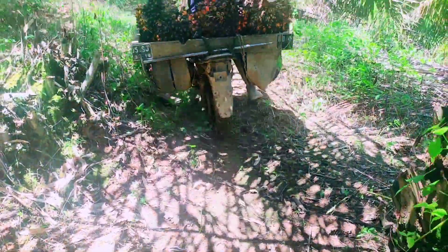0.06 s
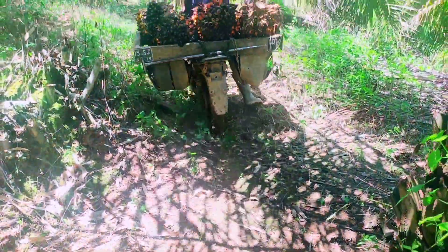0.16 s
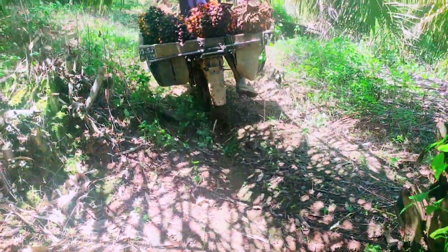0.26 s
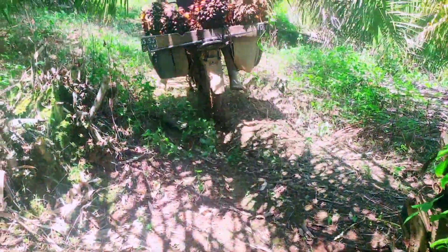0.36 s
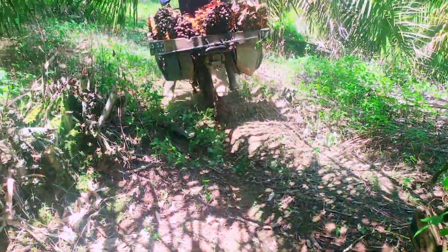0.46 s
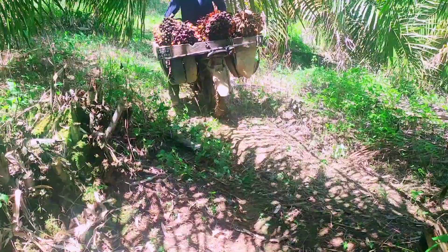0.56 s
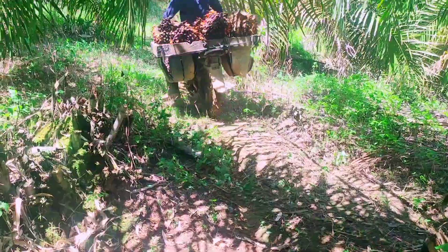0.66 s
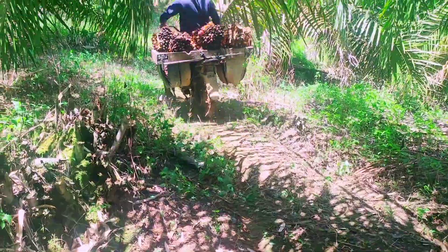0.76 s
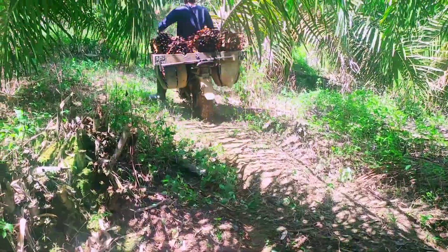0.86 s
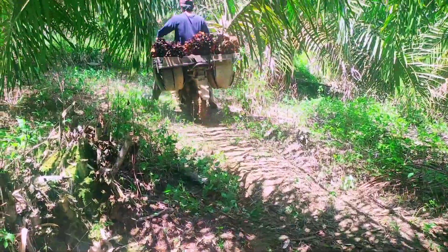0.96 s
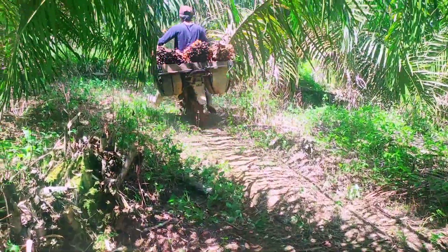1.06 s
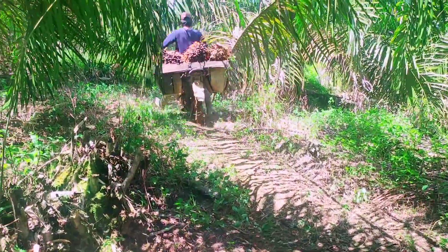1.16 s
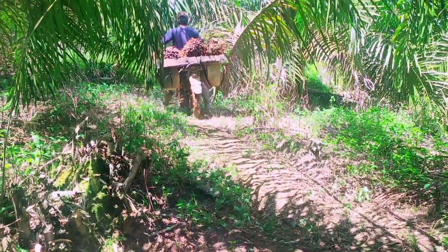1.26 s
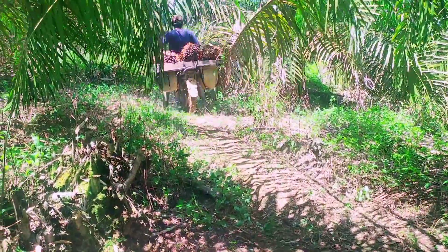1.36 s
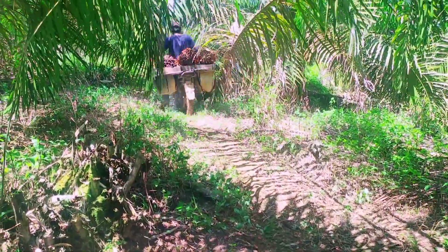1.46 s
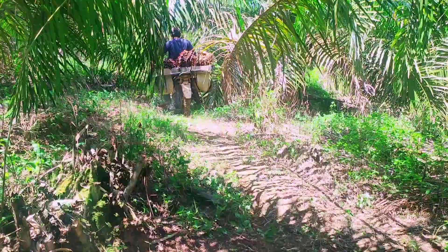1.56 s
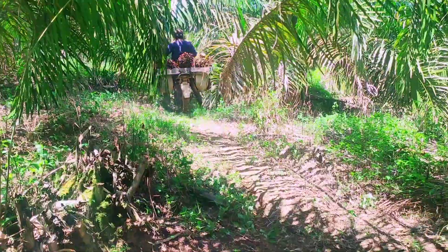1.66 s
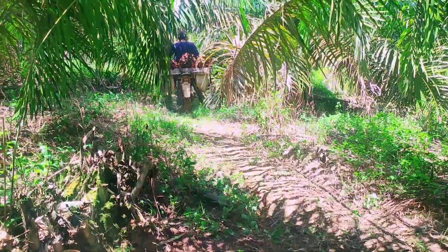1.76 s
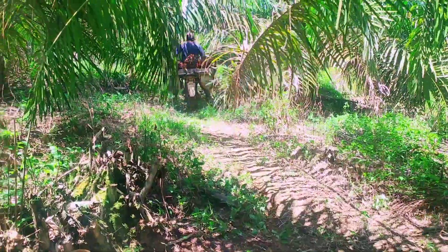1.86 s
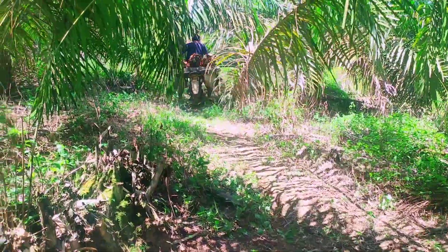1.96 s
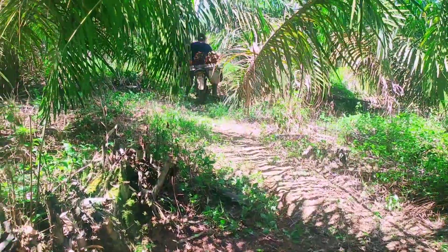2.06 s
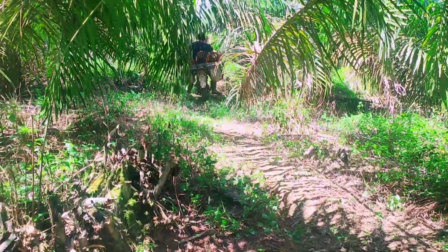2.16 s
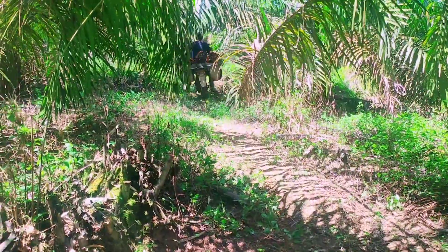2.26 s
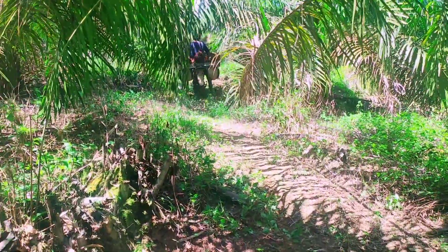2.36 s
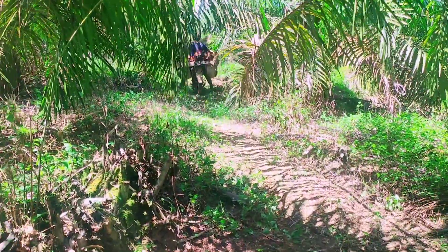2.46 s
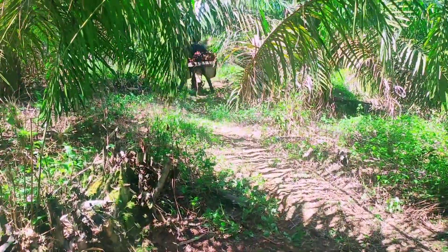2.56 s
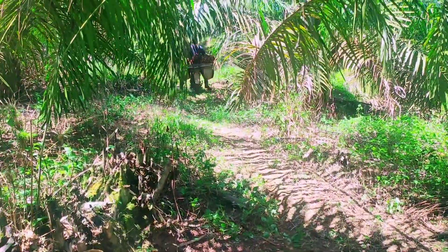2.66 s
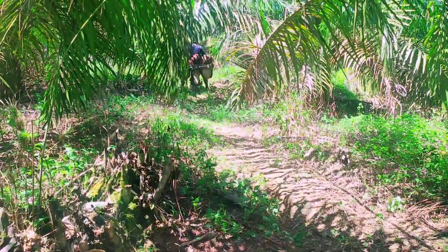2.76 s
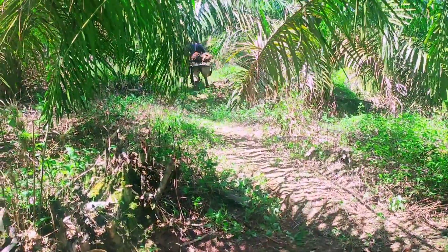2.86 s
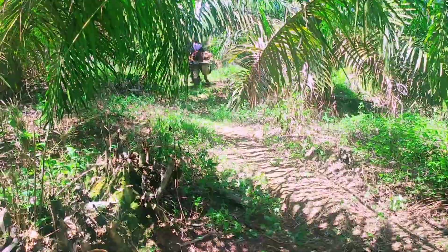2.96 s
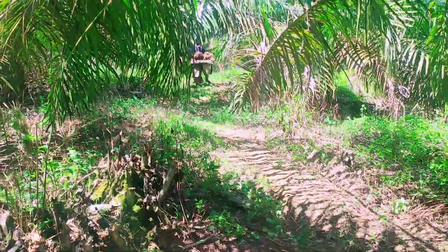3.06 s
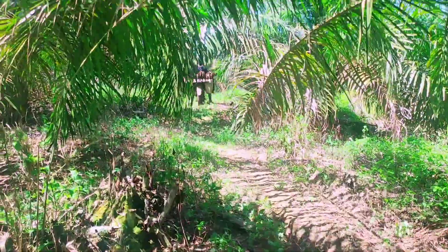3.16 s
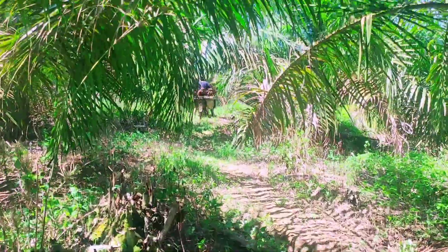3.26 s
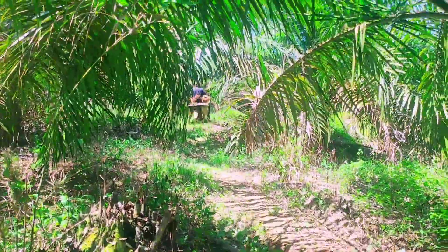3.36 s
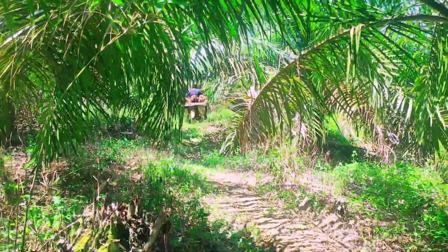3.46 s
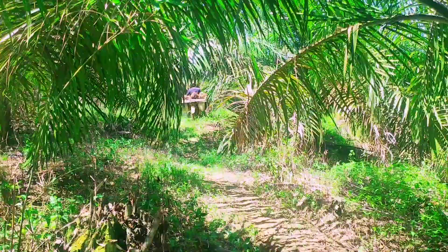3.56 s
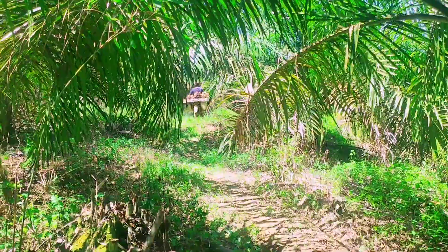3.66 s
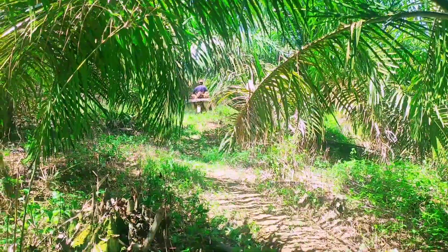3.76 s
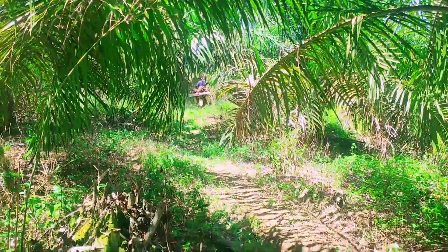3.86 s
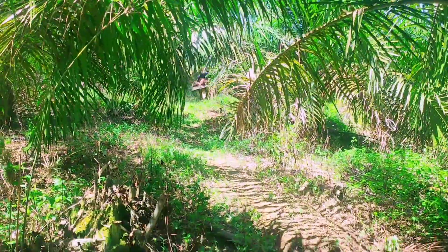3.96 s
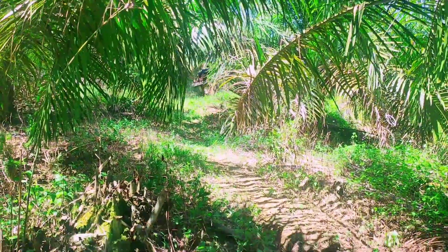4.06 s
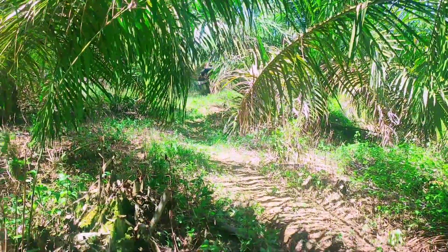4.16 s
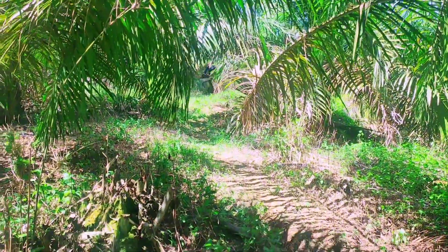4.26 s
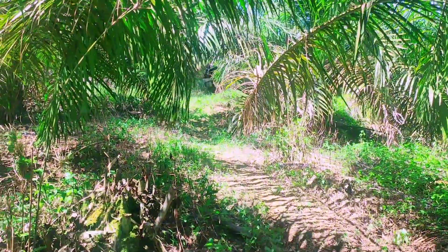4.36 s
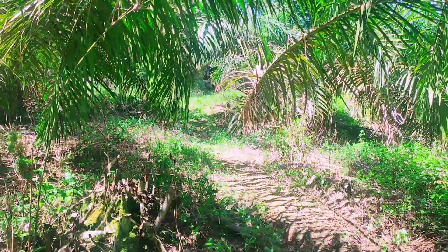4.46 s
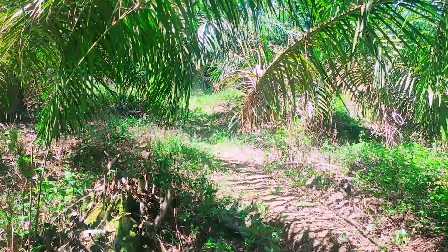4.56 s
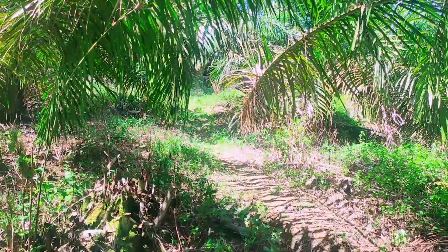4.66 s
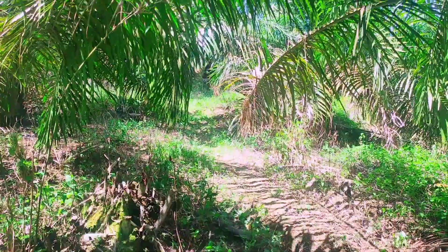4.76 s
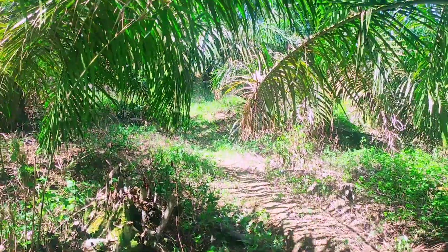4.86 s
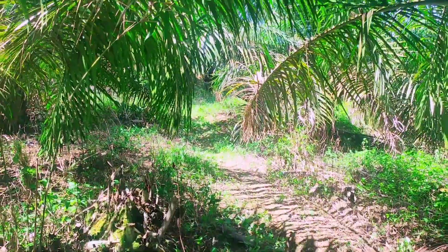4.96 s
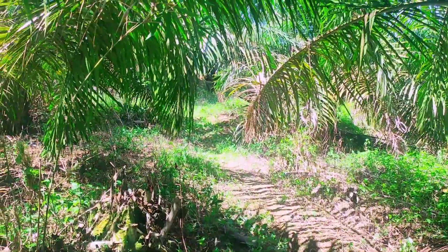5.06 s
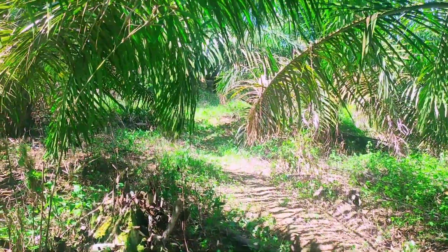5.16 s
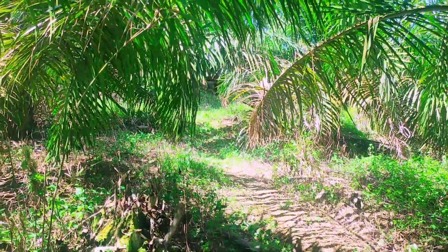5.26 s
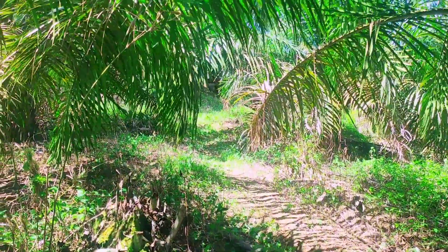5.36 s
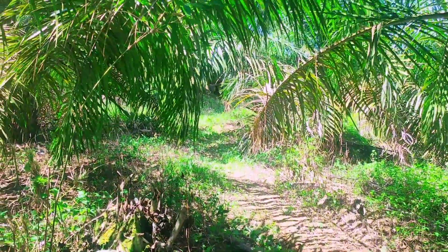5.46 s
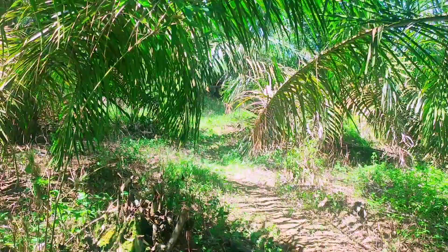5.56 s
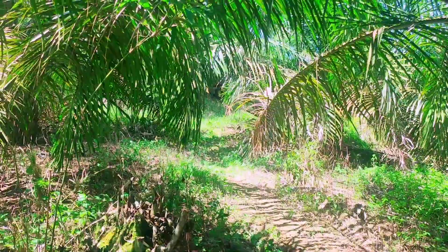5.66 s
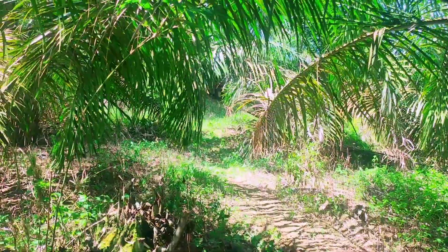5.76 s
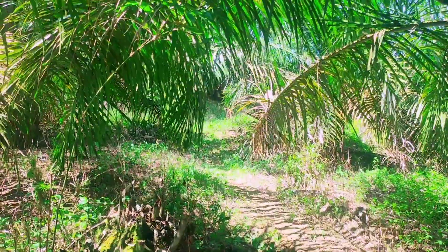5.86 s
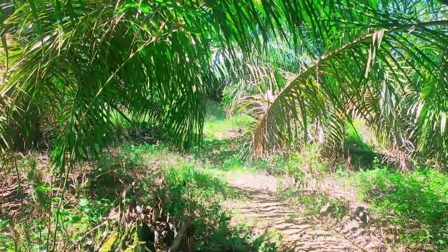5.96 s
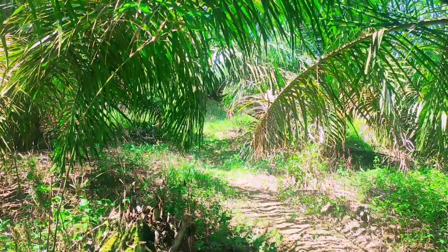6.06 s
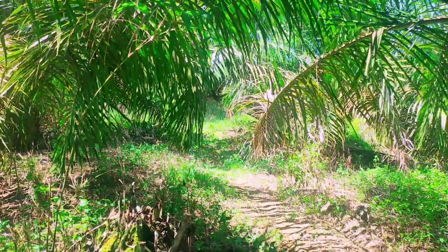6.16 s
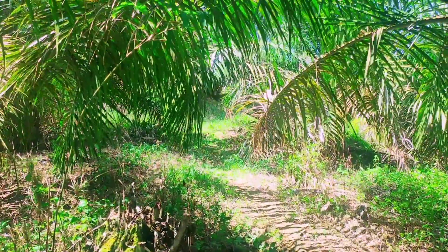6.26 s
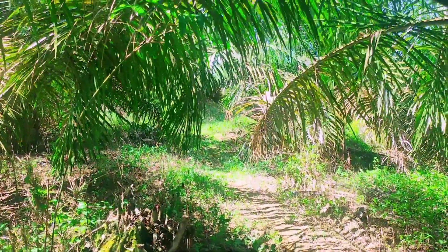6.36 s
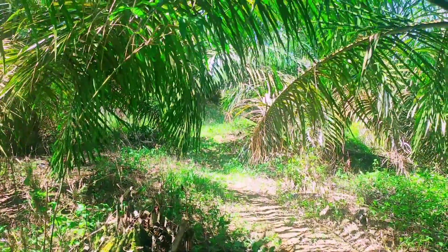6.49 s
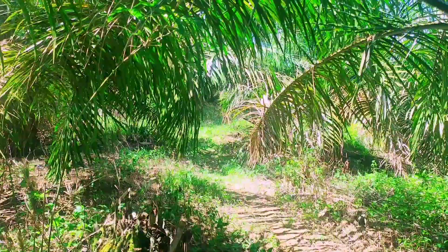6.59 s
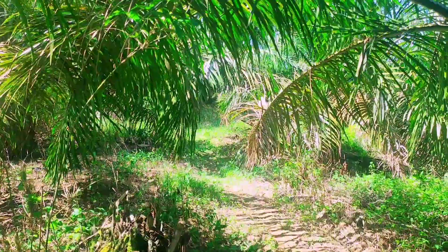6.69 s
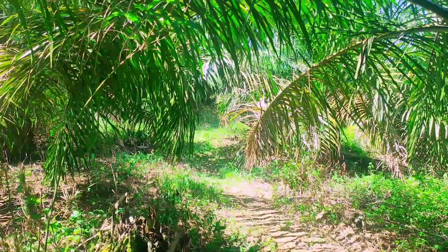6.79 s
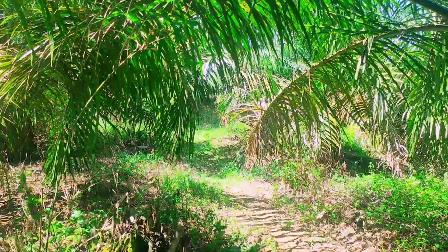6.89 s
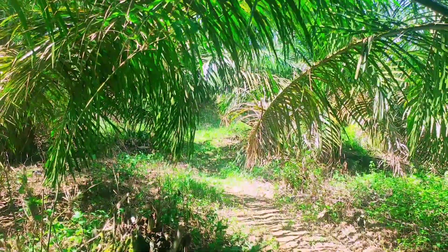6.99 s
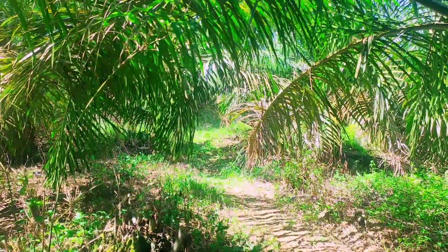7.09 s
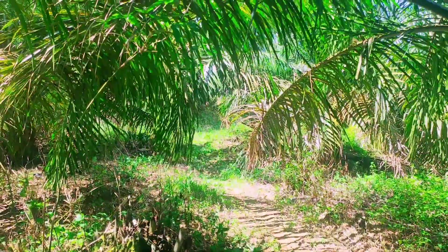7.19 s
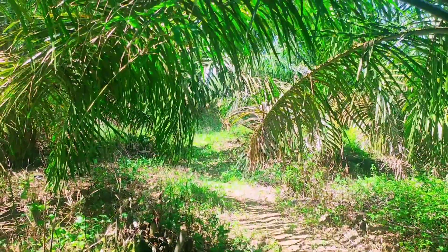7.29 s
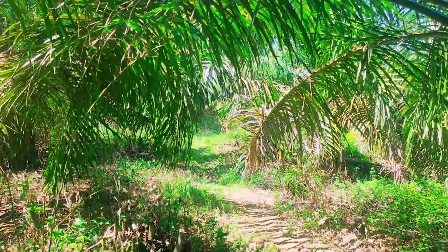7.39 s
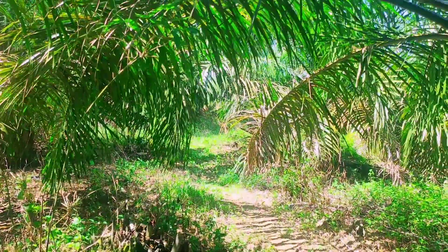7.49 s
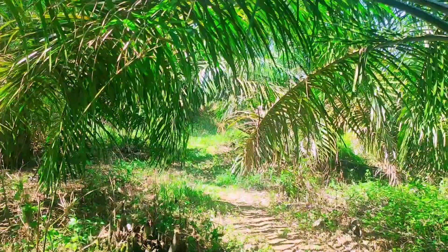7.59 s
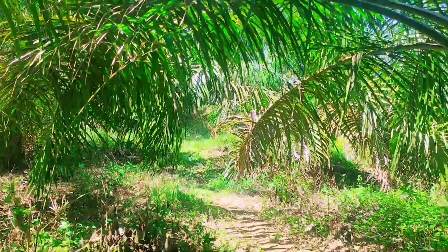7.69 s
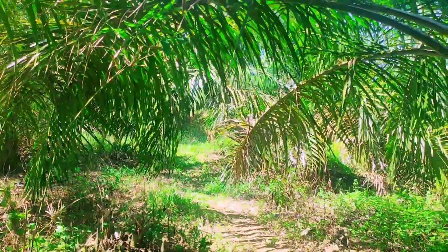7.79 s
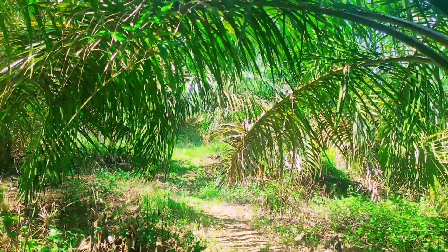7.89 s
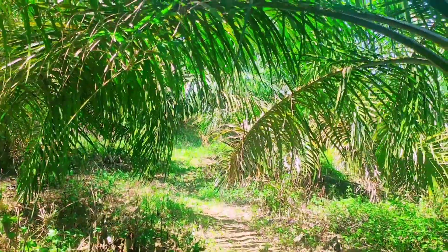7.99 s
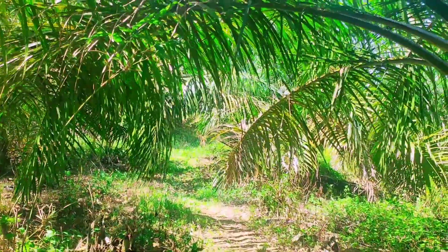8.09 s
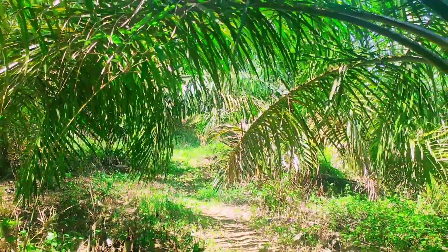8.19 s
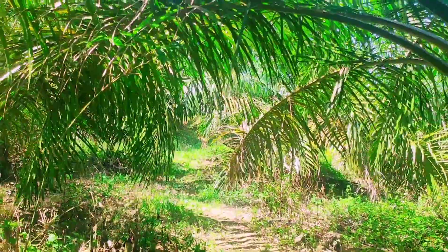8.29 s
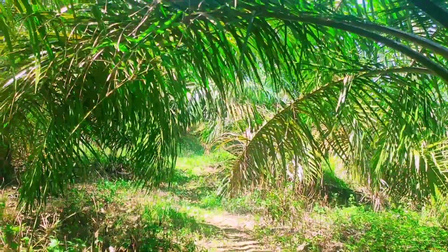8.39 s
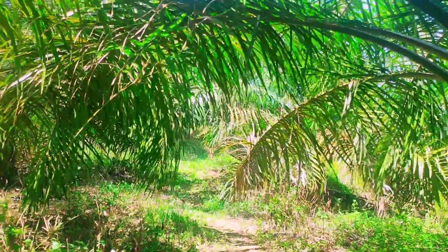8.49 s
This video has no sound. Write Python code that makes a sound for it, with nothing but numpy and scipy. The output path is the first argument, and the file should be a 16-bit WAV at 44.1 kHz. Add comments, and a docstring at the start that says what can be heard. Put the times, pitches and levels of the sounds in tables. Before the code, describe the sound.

A small, heavily laden single-cylinder petrol machine chugs away along a plantation track, its uneven raspy popping rising, faltering, then fading into the distance.

```python
"""Plantation track: a small, heavily laden single-cylinder petrol machine chugs along.
Each uneven firing is an impulse that excites the damped modes of pipe, silencer and sheet metal.
Gas hisses out after it as gated noise, over steady hiss, tyre and drive-train rumble and open air.
Palms return a short diffuse wash, and a low scrape comes near the end.
A small two-port microphone hears it all."""
import sys
import numpy as np
from scipy import signal
from scipy.fft import rfft, irfft
from scipy.io import wavfile
from scipy.ndimage import uniform_filter1d

SR = 44100
rng = np.random.default_rng(int(sys.argv[2]) if len(sys.argv) > 2 else 0)


def master_out(mix):
    """Clip the mix to full scale and print it as 16-bit PCM to the path in sys.argv[1]."""
    frames = np.transpose(np.atleast_2d(mix))
    ceiling = np.clip(frames, -1, 1)
    pcm = np.round(ceiling * 32767).astype(np.int16)
    wavfile.write(sys.argv[1], SR, pcm)


N = 376173
T = np.arange(N) / SR
WANDER = 0.056  # standard deviation of the silencer modes' shift per stroke, as a share; sheet metal doubles it


def gain_of(db):
    """Level definition: decibels to amplitude ratio."""
    return 10 ** (np.asarray(db) / 20)


def evened(x):
    """Power normalisation: scales to rms 1."""
    return x / np.sqrt(np.mean(x ** 2) + 1e-12)


def over_time(points):
    """Linear interpolation of a (time, value) table at every sample."""
    return np.interp(T, *np.transpose(points))


def read(points, hz):
    """Logarithmic frequency scale: interpolates a spectrum table along it."""
    f, value = np.transpose(points)
    return np.interp(np.log(hz + 1), np.log(f + 1), value)


def ring(clicks, hz, width):
    """Damped resonance: every click starts a dying cosine at hz, fixed or a curve."""
    r = np.exp(-np.pi * width / SR)
    if np.ndim(hz) == 0:
        return signal.lfilter([1], [1, -r * np.exp(2j * np.pi * hz / SR)], clicks).real
    turn = np.exp(2j * np.pi * np.cumsum(hz) / SR)
    return (turn * signal.lfilter([1], [1, -r], clicks / turn)).real


def hollow(x, hz, width, depth):
    """Destructive interference: takes a band out, as cancelling paths do."""
    band = 2 * (1 - np.exp(-np.pi * width / SR)) * ring(x, hz, width)
    return x - np.clip(depth, 0, 1) * band


# coherence of the two ports: frequency_hz, likeness (0-1)
PORT_LIKENESS = [(60, 0.43), (160, 0.96), (430, 0.38), (1160, 0.12), (3100, 0.4), (8300, 0.01)]


def noise(colour, patchy_db):
    """Partial coherence: two ports of coloured noise at rms 1, with drifting patches."""
    frames, hz = N // 128 + 5, np.fft.rfftfreq(512, 1 / SR)
    a, b, c, d, patches = rng.standard_normal((frames, 257, 5)).T
    patches = evened(uniform_filter1d(uniform_filter1d(patches, 8, 0), 8, 1))
    same = np.clip(read(PORT_LIKENESS, hz), -1, 1)[:, None]
    left = a + 1j * b
    right = same * left + np.sqrt(1 - same ** 2) * (c + 1j * d)
    spectra = np.array([left, right]) * gain_of(read(colour, hz)[:, None] + patchy_db * patches)
    return evened(signal.istft(spectra, nperseg=512, noverlap=384)[1][:, :N])


# slow course of the exhaust: start_s, pipe_pitch_hz, overtone_db, low_hollow_hz, high_hollow_hz,
# pipe_ring_db, snap_over_ring_db, gas_spurt_db
EXHAUST_COURSE = [(0, 171, 4.5, 503, 1114, -12, -6, -27), (.7, 173.6, 1.5, 438, 1187, -13.5, -7, -27),
                  (1.4, 186, 2, 296, 1192, -16.5, -4, -31.5),
                  (2.099, 206.5, -5.5, 280, 1127, -16, -5.5, -28),
                  (2.7, 223, -2, 312, 1120, -18.5, 2.5, -29), (2.92, 204, -18, 299, 1107, -17, -2.5, -30),
                  (3.35, 241, -32.5, 290, 1030, -20.5, -4.5, -34.5),
                  (3.55, 226.5, -29, 311, 974, -23, -2.5, -37.5), (4, 215.6, -12, 321, 962, -21, -7.5, -37),
                  (4.551, 207, -8, 343, 920, -20, 2, -33.5), (4.73, 239, -11, 336, 954, -21.5, -3.5, -38),
                  (4.92, 211, -1, 331, 973, -16.5, -1, -32.5), (5.151, 170.6, 1, 355, 953, -20, -8.5, -37),
                  (5.45, 157.6, -1, 368, 960, -20, -6, -38.5), (6, 168.5, -4.5, 340, 952, -19, -7.5, -36.5),
                  (6.7, 161.4, -7.5, 347, 920, -19.5, -12.5, -39),
                  (7.4, 170, -12, 342, 925, -22, -13.5, -42), (7.9, 164.6, -5, 331, 974, -21, -14.5, -41),
                  (8.53, 159, -32, 353, 875, -28, -6, -50)]


def track(s):
    """Quasi-steady change: the columns of the exhaust's course at times s."""
    at, *columns = np.transpose(EXHAUST_COURSE)
    return [np.interp(s, at, c) for c in columns]


# the engine falters: start_s, end_s, whole_engine_level_db
FALTERS = [(1.663, 1.74, -2), (1.84, 1.94, -4), (3.733, 3.833, 5.5), (3.88, 3.98, 4.5), (4.788, 4.867, -3),
           (5.199, 5.335, -12)]


def lull(s):
    """Amplitude modulation: level change in dB at times s, with ramps of 0.004 s."""
    ramps = ((db, np.minimum(s - start, end - s) / 0.004) for start, end, db in FALTERS)
    return sum(db * np.clip(ramp, 0, 1) for db, ramp in ramps)


RING_SHARE, SPURT_SHARE = 0.46, 1.26  # dB of ring and of gas spurt for each dB of edge
SOFT_FROM_DB, SOFT_SPAN_DB = -4, 13  # below this edge a stroke starts to swell softly
# the firings: start_s, edge_db (over the usual edge)
FIRINGS = [(0.0065, -3.5), (0.0538, -1), (0.083, 2.5), (0.1085, 2), (0.137, 2), (0.1646, 2), (0.1997, 2.5),
           (0.2208, 0), (0.2536, 2.5), (0.287, 3.5), (0.308, -1), (0.33, -5.5), (0.363, 3), (0.384, 3),
           (0.404, -1.5), (0.423, -12), (0.446, -1), (0.4818, 4.5), (0.5038, 1), (0.525, 3), (0.5464, 4.5),
           (0.5681, -12.5), (0.5881, 3.5), (0.6087, -3.5), (0.643, 1), (0.6793, -0.5), (0.7008, -4),
           (0.734, 1), (0.756, 1.5), (0.7907, 2), (0.8289, -3.5), (0.8616, -1.5), (0.8885, -5),
           (0.9193, 2.5), (0.9564, -2), (0.9803, -3), (1.0061, -4), (1.035, 1), (1.0553, -3), (1.0787, -12),
           (1.1, 0), (1.1298, 0), (1.1691, -4.5), (1.1837, -6.5), (1.204, -14), (1.2218, -0.5),
           (1.2523, -1), (1.2843, 4), (1.3043, -7), (1.324, -7), (1.3419, 3.0), (1.3829, 2.5), (1.424, 3),
           (1.4664, -2.5), (1.4988, 1.5), (1.52, 0), (1.543, -5.5), (1.563, -2), (1.5772, -17),
           (1.5973, 3.5), (1.619, 1.5), (1.6582, 0), (1.6895, -5), (1.732, -2.5), (1.7542, -2.5),
           (1.7755, -2), (1.7967, 0.5), (1.828, 0.5), (1.8699, -2.5), (1.912, -3), (1.93, -5), (1.9665, -1),
           (1.985, -5.5), (2, -4.5), (2.0355, -1), (2.0539, -2.5), (2.0755, -5), (2.0979, -6),
           (2.131, -1.5), (2.1698, -1), (2.1916, -2), (2.2236, 0), (2.2593, -1.5), (2.2858, -2.5),
           (2.3179, 0), (2.358, -1), (2.3781, -4.5), (2.4014, -3.5), (2.4181, -11), (2.4341, -1),
           (2.4709, -1.5), (2.4982, -3), (2.5329, -3.5), (2.5581, -5), (2.5843, 1), (2.6136, -1.5),
           (2.6418, -4), (2.6705, -4), (2.6939, -3.5), (2.722, -3.5), (2.7499, -1), (2.7779, -3),
           (2.7947, -4.5), (2.823, 0), (2.852, -2), (2.869, -0.5), (2.898, 0), (2.933, 0.5), (2.964, -1.5),
           (3.0, -5), (3.0259, -4), (3.0532, -7.5), (3.057, 0), (3.0746, -1), (3.1042, -0.5),
           (3.1393, -5.0), (3.1635, -4.5), (3.187, -2.5), (3.21, 3.5), (3.2355, 4.5), (3.2623, -2),
           (3.2885, -2.5), (3.3139, 1), (3.3396, 3), (3.365, 4), (3.407, -3.5), (3.4287, -3.5),
           (3.4571, 0.5), (3.4901, 2.5), (3.518, 4.5), (3.5473, 0.5), (3.5644, 0.5), (3.593, 0),
           (3.6102, -2), (3.6515, -3.5), (3.6778, -2.5), (3.706, 2), (3.7401, -5.5), (3.763, -6),
           (3.79, -5), (3.8201, -8), (3.8522, 1.5), (3.8883, -4.5), (3.912, -5.5), (3.946, -7),
           (3.9644, -6), (3.98, -8.5), (4.006, -1), (4.0426, -0.5), (4.0702, 3), (4.106, 3.5), (4.141, 3),
           (4.1722, -0.5), (4.2078, -4), (4.24, -2.5), (4.2607, -5.5), (4.3018, -5), (4.319, -4),
           (4.3403, 0), (4.3691, -4), (4.3934, -5), (4.4172, -5.5), (4.441, -3), (4.469, -2.5), (4.498, -1),
           (4.527, -2.5), (4.5492, -0.5), (4.57, -2.5), (4.605, 1), (4.6342, 3.5), (4.6627, 4.5),
           (4.6938, 1), (4.7163, 3.5), (4.734, 4), (4.7603, 1.0), (4.7837, -0.5), (4.8111, -9.5),
           (4.8374, -1.5), (4.8692, -3.5), (4.9044, -2.5), (4.9341, 0.5), (4.964, 0), (4.9805, -1),
           (5.0103, 2.5), (5.054, 2), (5.1027, 3), (5.1247, -1), (5.1471, 4), (5.1691, 2), (5.1979, -0.5),
           (5.2183, -13.5), (5.2405, 0.5), (5.2766, -6), (5.3012, -9), (5.334, 0.5), (5.3706, 3),
           (5.3926, -4), (5.4249, 3.5), (5.4466, 2.5), (5.4745, 5), (5.5, 2.5), (5.526, 3.5), (5.557, 2),
           (5.5784, -3), (5.6011, -4.5), (5.6324, -1), (5.6578, 0), (5.6872, -1), (5.7235, 0), (5.7448, -2),
           (5.7954, 3.5), (5.8231, 2.0), (5.8498, 1.5), (5.8773, -1.5), (5.9101, 2), (5.9598, 2.5),
           (5.982, 1), (6.0032, -0.5), (6.0267, -1), (6.049, -4), (6.0775, 0), (6.107, 0), (6.1413, -0.5),
           (6.1654, 1), (6.1886, -3), (6.2204, 0), (6.2548, -1), (6.276, -2.5), (6.298, -5), (6.3318, 2.5),
           (6.3611, 1.0), (6.3777, -19.5), (6.398, 1.0), (6.4206, -3.5), (6.442, -2), (6.4698, 1),
           (6.4904, -16.5), (6.5114, 2), (6.533, -3), (6.5544, -2.5), (6.582, -1), (6.61, 0), (6.6536, 4.5),
           (6.6788, -1), (6.7043, 0), (6.7414, -0.5), (6.7667, -3.5), (6.7922, -1), (6.822, 1),
           (6.859, 1.5), (6.8883, 0), (6.918, 1.5), (6.954, 2.5), (6.9749, -4), (7.0046, 1.0),
           (7.0361, 0.5), (7.0722, 3), (7.101, 2), (7.1383, -7), (7.1598, 0.5), (7.1897, 1.5),
           (7.2145, 2.5), (7.2447, 2), (7.2772, 0), (7.2946, -4), (7.3283, 3), (7.3649, -1), (7.3919, 0.5),
           (7.41, -6.5), (7.4435, 1), (7.474, 2), (7.5134, 0), (7.532, -3.5), (7.5603, -0.5), (7.591, 1.5),
           (7.6305, 1.5), (7.6622, 1.5), (7.696, 0), (7.7135, -5.5), (7.7501, 1), (7.7772, -2),
           (7.8119, -3), (7.8359, -3.5), (7.8637, 0.5), (7.904, -3), (7.927, -3.5), (7.9512, -7.5),
           (7.9724, -11.5), (7.9964, 1), (8.016, -5), (8.0469, -2), (8.0872, -6.0), (8.1234, -1.5),
           (8.1479, -3), (8.1836, -4.5), (8.211, -3), (8.2437, -4.5), (8.2609, -15), (8.2823, -2),
           (8.319, -5), (8.3491, -6), (8.3754, -1.5), (8.4101, -4.5), (8.436, -9.5), (8.462, -3),
           (8.511, -4.5)]


def firings():
    """Impulsive excitation: sample, ring, snap and spurt levels of each firing, and the softness curve."""
    s, edge_db = np.transpose(FIRINGS)
    ring_db, snap_db, spurt_db = track(s)[-3:]
    whole_db = lull(s)
    soft = np.clip((SOFT_FROM_DB - edge_db) / SOFT_SPAN_DB, 0, 1)
    soft = np.clip(soft + np.maximum(whole_db, 0) / 14, 0, 1)  # a sputtering engine burbles softly
    ring_db = ring_db + RING_SHARE * edge_db + whole_db
    snap_db = snap_db + (1 - RING_SHARE) * edge_db
    spurt_db = spurt_db + SPURT_SHARE * edge_db + whole_db
    return np.round(s * SR).astype(int), ring_db, snap_db, spurt_db, np.interp(T, s, soft)


def stroke(at):
    """Restart at each firing: for every sample, index of the latest firing and seconds since it."""
    latest = np.maximum(np.searchsorted(at, np.arange(N), "right") - 1, 0)
    return latest, np.maximum(T - at[latest] / SR, 0)


def blast(at, db, spread_db, ms):
    """Pressure pulse: a smooth puff of uneven size; the valve takes about ms to open and shut."""
    clicks, puff = np.zeros(N), np.hanning(round(ms * SR / 1000) + 3)
    clicks[at] = gain_of(db + spread_db * rng.standard_normal(len(at)))
    return signal.oaconvolve(clicks, puff / puff.sum(), "same")


# damping of the pipe: start_s, multiple of its mode widths
PIPE_DAMPING = [(0, 1.1), (2.6, 1.1), (3.3, .85), (4.7, 1), (8.53, 1.1)]


def damped(clicks, hz, width, soft):
    """Variable damping: blends a narrow and a wide ring by the damping curve and the softness."""
    wide = np.clip((over_time(PIPE_DAMPING) - .7) / .9 + soft, 0, 1)
    return ring((1 - wide) * clicks, hz, .7 * width) + ring(wide * clicks, hz, 1.6 * width)


# pipe modes: multiple of pipe pitch, width_hz (before damping), level_db
PIPE_MODES = [(1, 76, 7.5), (.76, 53, -9.5), (1.07, 31.5, -5.5)]
# fixed overtone: frequency_hz, width_hz
OVERTONE_MODE = (282.7, 52.3)
# silencer can modes: multiple of the high hollow, width_hz, level_db
SILENCER_MODES = [(0.378, 123, 5), (0.554, 226.6, 13), (0.778, 237, 8.5)]
# thin tone a soft stroke leaves in the silencer: frequency_hz (before wander), width_hz, level_db
BURBLE_MODE = (680, 70, -20)
# band under the pipe that full strokes lack: multiple of pipe pitch, width_hz, depth (0-1)
UNDER_HOLLOW = (0.57, 50.4, 0.41)
# the band under the high hollow closes with distance: start_s, depth (0-1)
UNDER_HIGH_DEPTH = [(5.1, 0.05), (5.6, 0.8), (8.53, 0.7)]
# how far the band above the high hollow is dimmed: start_s, depth (0-1)
ABOVE_HIGH_DEPTH = [(0, 0.3), (2, 0.33), (3.5, 1), (5.3, 0.93), (6, 0.05)]
SOFT_SAG = 0.25  # share by which a fully soft stroke lowers the pipe pitch
RISE, RISE_S = 0.074, 0.014  # the pipe starts flat by this share and climbs to pitch as it rings out


def exhaust(at, ring_db, snap_db, soft, hz, overtone_db, low_hz, high_hz):
    """Modal resonance: pipe and silencer ring after each blast; some bands cancel on the way."""
    sharp = blast(at, ring_db, spread_db=.8, ms=2.6)
    slow = blast(at, ring_db, spread_db=.8, ms=7.5)
    push = gain_of(4.5) * (1 - soft) * sharp + gain_of(15.5) * soft * slow  # a weak burn swells slowly
    latest, since = stroke(at)
    pitch = hz * (1 - SOFT_SAG * soft) * (1 - RISE * np.exp(-since / RISE_S))
    pipe = sum(gain_of(db) * damped(push, k * pitch, w, soft) for k, w, db in PIPE_MODES)
    pipe += gain_of(overtone_db) * ring(push, *OVERTONE_MODE)

    shift = 1 + WANDER * rng.standard_normal((len(at), len(SILENCER_MODES) + 1))[latest].T
    burble_hz, burble_width, burble_db = BURBLE_MODE
    burble_push = soft * blast(at, ring_db, spread_db=3, ms=1.3)
    burble = gain_of(burble_db) * ring(burble_push, burble_hz * shift[-1], burble_width)

    snap = np.zeros(N)
    for (k, width, db), move in zip(SILENCER_MODES, shift):
        # each stroke shares its edge unevenly among the modes
        edge = (1 - soft) ** 2 * blast(at, ring_db + snap_db, spread_db=1.55, ms=1.0)
        snap += gain_of(db) * ring(edge, k * high_hz * move, width)

    heard = hollow(pipe + burble + snap, low_hz, 95, depth=0.72)
    heard = hollow(heard, high_hz, 240, depth=0.9)
    under, under_width, under_depth = UNDER_HOLLOW
    heard = hollow(heard, under * hz, under_width, depth=under_depth * (1 - soft))
    # a middle hollow fills in with distance, as the high hollow falls
    heard = hollow(heard, 478, 120, depth=np.minimum((high_hz - 1000) / 220, .6))
    heard = hollow(heard, 0.876 * high_hz, 150, depth=over_time(UNDER_HIGH_DEPTH))
    heard = hollow(heard, 1.375 * high_hz, 740, depth=over_time(ABOVE_HIGH_DEPTH))
    # a narrow outlet radiates little bass
    heard = signal.sosfilt(signal.butter(2, 85, "high", fs=SR, output="sos"), heard)
    return signal.sosfiltfilt(signal.butter(2, 100, "high", fs=SR, output="sos"), heard)


# decay of the echoes: frequency_hz, t60_s
PALM_DECAY = [(150, 0.059), (600, 0.12), (2000, 0.066)]


def palms(x):
    """Diffuse reflection: sparse echoes off trunks and fronds, each band dying at its own speed."""
    taps = np.zeros((2, SR // 2))
    at = np.arange(200, SR // 2 - 20, 20) + rng.integers(0, 20, (2, 1))
    np.put_along_axis(taps, at, rng.choice([-1., 1.], at.shape), 1)
    taps[1] = .6 * taps[0] + .8 * taps[1]  # close ports hear partly the same echoes
    hz, t, z = signal.stft(taps, SR, nperseg=256)
    decay = gain_of(-60 * t / read(PALM_DECAY, hz)[:, None])
    tail = signal.istft(z * decay, SR, nperseg=256)[1]
    return signal.oaconvolve(x[None], tail / np.linalg.norm(tail[0]), axes=1)[:, :N]


# thin sheet metal round the outlet: frequency_hz (before wander), width_hz, level_db (before the curves below)
SHEET_MODES = [(1055, 71, -14), (1452, 170, -15), (1775, 71, -12), (2460, 270, -9), (3330, 320, -11),
               (3800, 130, -12.5), (6100, 1500, -5.5)]
# lowest sheet mode: start_s, level_db
LOWEST_LEVEL = [(0, 5.5), (1.5, 7.5), (3.5, -22), (5.7, 2), (8.53, 14.5)]
# second and third sheet modes: start_s, level_db
SECOND_THIRD_LEVEL = [(0, 8), (2.7, 5), (3.5, -3), (5.1, 1.5), (5.7, 13), (7, -2), (8.53, 11)]
# fourth to sixth sheet modes: start_s, level_db
UPPER_LEVEL = [(0, 9.5), (1, 5), (1.6, -10), (3, -5.5), (3.8, 5.5), (8.53, 5)]


def crack(at, spurt_db):
    """Plate modes: each firing rings the outlet's metal by chance amounts, a moment after the blast."""
    shift = 1 + 2 * WANDER * rng.standard_normal((len(at), len(SHEET_MODES)))[stroke(at)[0]].T
    shift[0] = 1  # the lowest mode holds its pitch
    modes = []
    for (hz, width, db), move in zip(SHEET_MODES, shift):
        tap = blast(at + 30, spurt_db, spread_db=min(hz / 600, 5), ms=.3)  # 30 samples late
        modes.append(gain_of(db) * ring(tap, hz * move, width))
    modes = np.array(modes)
    modes[0] *= gain_of(over_time(LOWEST_LEVEL))
    modes[1:3] *= gain_of(over_time(SECOND_THIRD_LEVEL))
    modes[3:6] *= gain_of(over_time(UPPER_LEVEL))
    treble = np.array(SHEET_MODES)[:, 0] >= 2200
    sides = rng.choice([-1., 1.], len(SHEET_MODES)) * treble  # treble arrives off-centre
    return modes.sum(0) + 0.35 * np.outer([1, -1], sides @ modes)


HISS_DB, HISS_SHARE = -52, 1  # steady hiss at a spurt of -35 dB, and its dB per dB of spurt
# colour of the hiss: frequency_hz, relative density_db (per Hz)
HISS_COLOUR = [(820, -0.5), (1400, -9), (2150, -7), (3110, -10), (4500, -10.5), (5340, -9.5), (6720, 0.5),
               (7620, -6.5), (8200, -22.5), (10700, -64)]


def hiss(at, spurt_db, usual_spurt_db):
    """Turbulent jet noise: a sharp gas spurt and slower sigh, over steady intake and chain noise."""
    t = np.arange(SR // 8) / SR
    escape = np.exp(-t / 0.0029) + 0.21 * np.exp(-t / 0.026)
    gate = signal.oaconvolve(blast(at, spurt_db - 1.5, spread_db=1.5, ms=0.93), escape)[:N]
    steady_db = HISS_DB + HISS_SHARE * (usual_spurt_db + 35) + lull(T)
    steady = gain_of(steady_db) * noise(HISS_COLOUR, patchy_db=2.2)
    return gate * noise(HISS_COLOUR, patchy_db=3.6) + steady


RUMBLE_DB, RUMBLE_SHARE = -39.5, 0.42  # rumble at a ring of -19.5 dB, and its dB per dB of ring
# colour of tyres and drive train: frequency_hz, relative density_db (per Hz)
RUMBLE_COLOUR = [(18, -29), (30, -14), (210, 7.5), (360, -22), (779, -22.5), (952, -52), (1900, -89)]


def rumble(usual_ring_db):
    """Broadband rolling noise: tyres and drive train follow part of the exhaust's level."""
    level_db = RUMBLE_DB + RUMBLE_SHARE * (usual_ring_db + 19.5)
    return gain_of(level_db) * noise(RUMBLE_COLOUR, patchy_db=1.5)


# colour of the open air: frequency_hz, relative density_db (per Hz)
AIR_COLOUR = [(500, -6.5), (1500, 2.5), (7000, -7.5)]


def open_air():
    """Stationary background noise: a faint steady hiss."""
    return gain_of(-63.5) * noise(AIR_COLOUR, patchy_db=4.0)


SCUFF_S, SCUFF_DB, SCUFF_RISE_S, SCUFF_T60_S = 7.942, -29.5, .06, .45  # peak time and level, 60 dB rise and fall
# resonances of the scrape: frequency_hz, width_hz, level_db (relative)
SCUFF_MODES = [(200, 53, 7.5), (286, 60, 17), (560, 330, -11)]


def scuff():
    """Friction excitation: a brief rough scrape drives a few low resonances."""
    rub = uniform_filter1d(rng.standard_normal(N), size=30)
    rub = evened(sum(gain_of(db) * ring(rub, f, w) for f, w, db in SCUFF_MODES))
    since = T - SCUFF_S
    return gain_of(SCUFF_DB - 60 * np.maximum(since / SCUFF_T60_S, -since / SCUFF_RISE_S)) * rub


def scene():
    """Superposition: exhaust, its echoes, crack, hiss, rumble, the open air and a scrape."""
    *colour, usual_ring_db, _, usual_spurt_db = track(T)
    at, ring_db, snap_db, spurt_db, soft = firings()
    pops = exhaust(at, ring_db, snap_db, soft, *colour)
    echoes = gain_of(-16) * palms(pops)
    engine = pops + echoes + crack(at, spurt_db) + hiss(at, spurt_db, usual_spurt_db)
    return engine + rumble(usual_ring_db) + open_air() + scuff()


LAG_S, EDGE_HZ = 3e-5, 8900  # the left port hears this much later; upper band limit
# balance of the ports: frequency_hz, left_over_right_db
PORT_BALANCE = [(230, 0.0), (360, 1.0), (560, -0.5), (1380, 4), (2160, 5.0), (3390, 0.0), (5300, 5.0)]


def record(dry):
    """Transducer response: soft overload, bass cut, treble roll-off, unequal ports, then the band limit."""
    overloaded = 1.1 * np.tanh(dry / 1.1)
    thin = signal.sosfilt(signal.butter(2, 45, "high", fs=SR, output="sos"), overloaded)
    dull = signal.sosfilt(signal.butter(14, 7700, fs=SR, output="sos"), thin)
    hz = np.fft.rfftfreq(N, 1 / SR)
    # each port takes half of the level difference and half of the delay
    left = gain_of(read(PORT_BALANCE, hz) / 2) * np.exp(-1j * np.pi * hz * LAG_S)
    ports = irfft(rfft(dull) * np.array([left, 1 / left]), N)
    band = signal.firwin(511, EDGE_HZ, window=("kaiser", 9), fs=SR)
    return signal.oaconvolve(ports, band[None], "same")


dry = scene()
out = record(dry)
master_out(out)
```